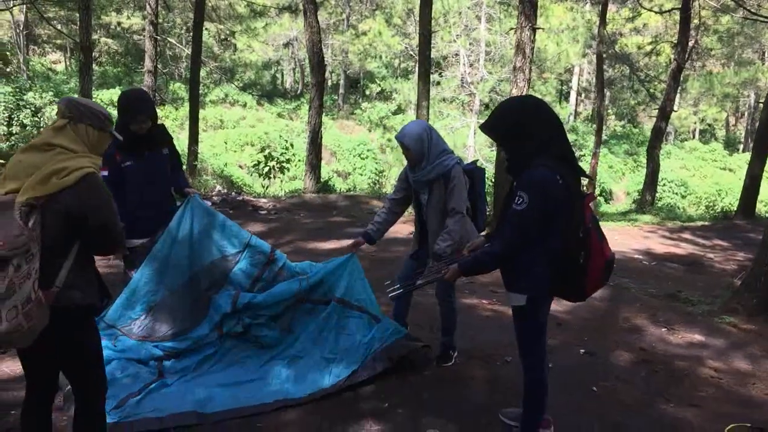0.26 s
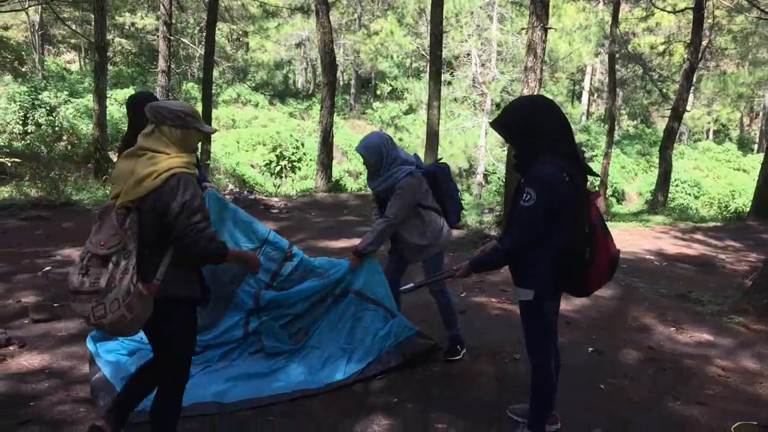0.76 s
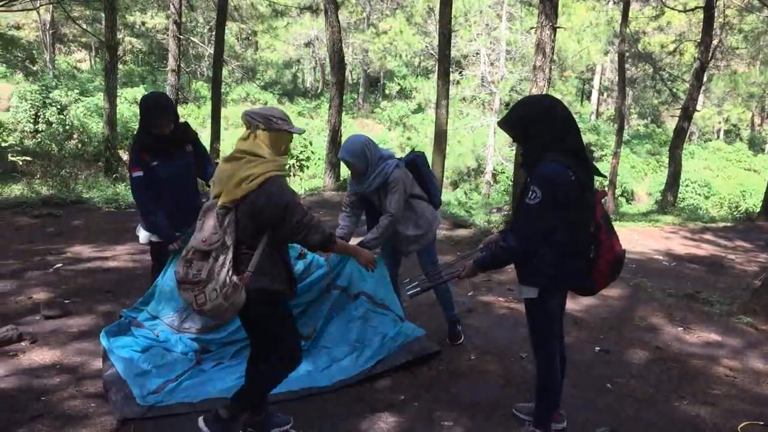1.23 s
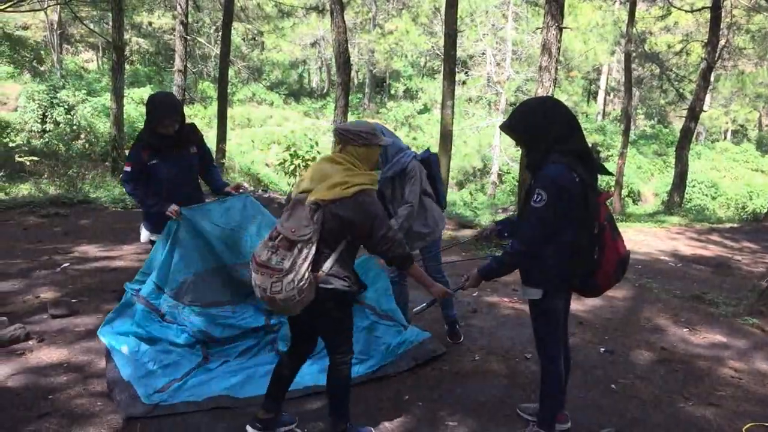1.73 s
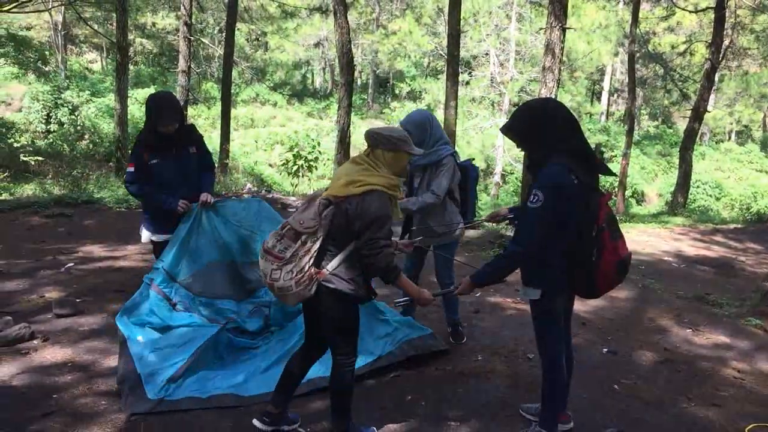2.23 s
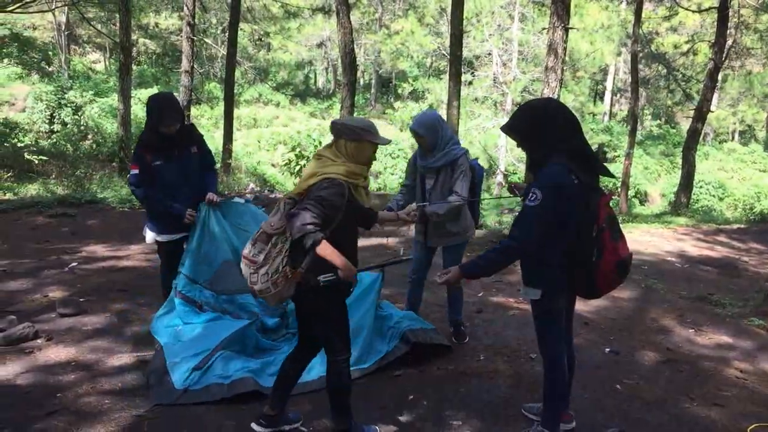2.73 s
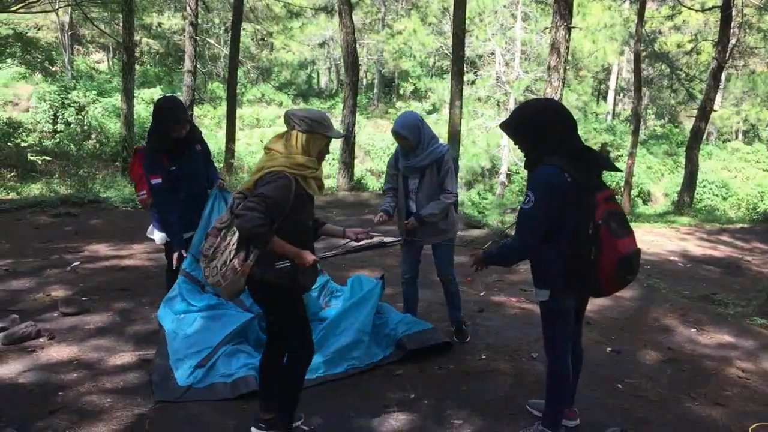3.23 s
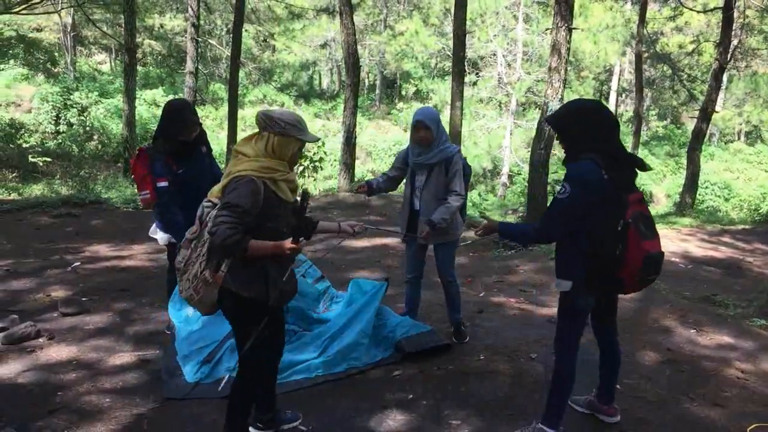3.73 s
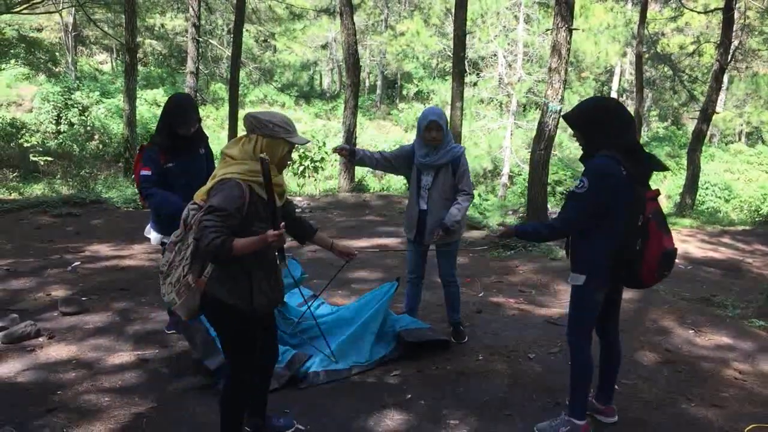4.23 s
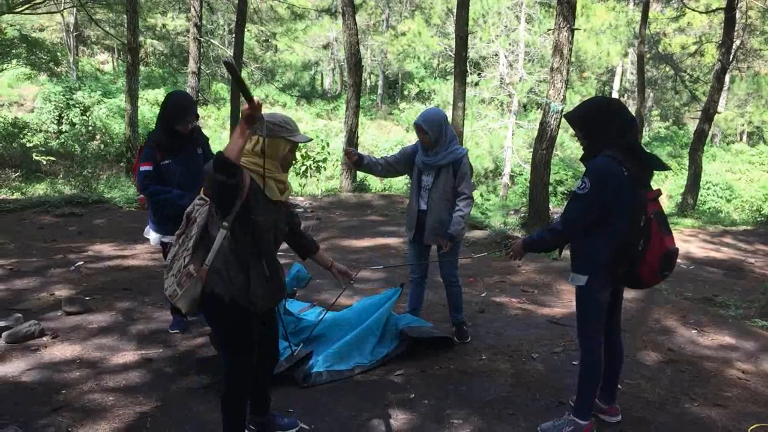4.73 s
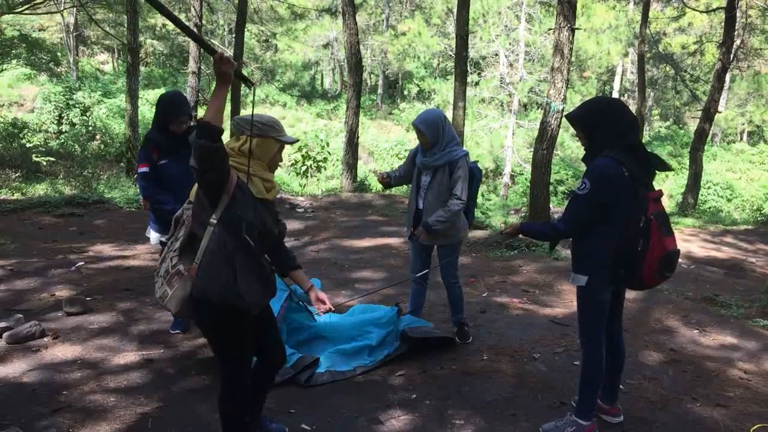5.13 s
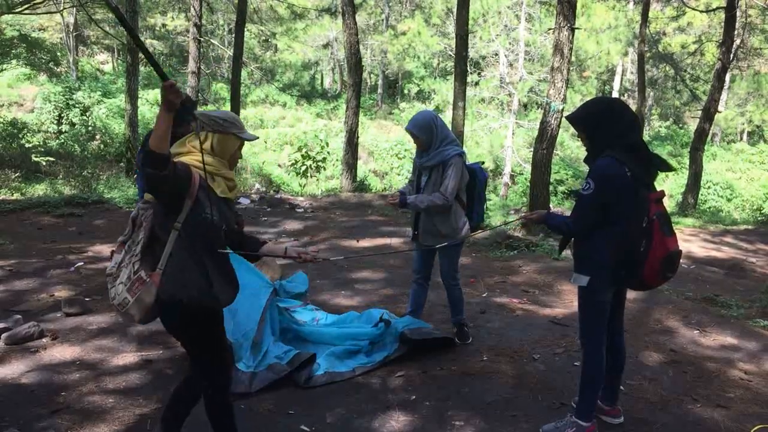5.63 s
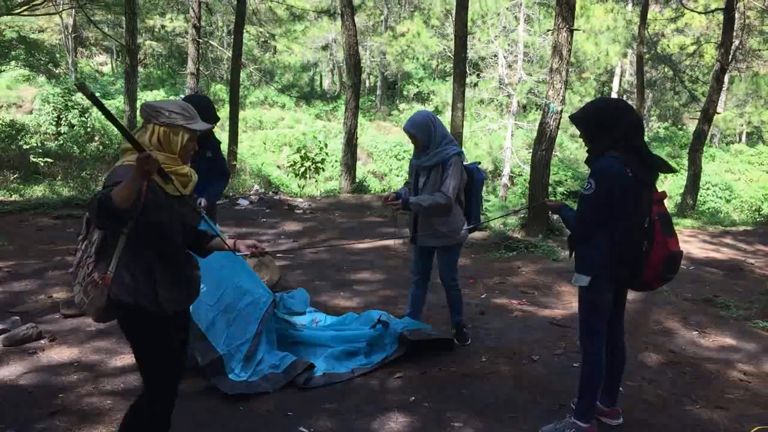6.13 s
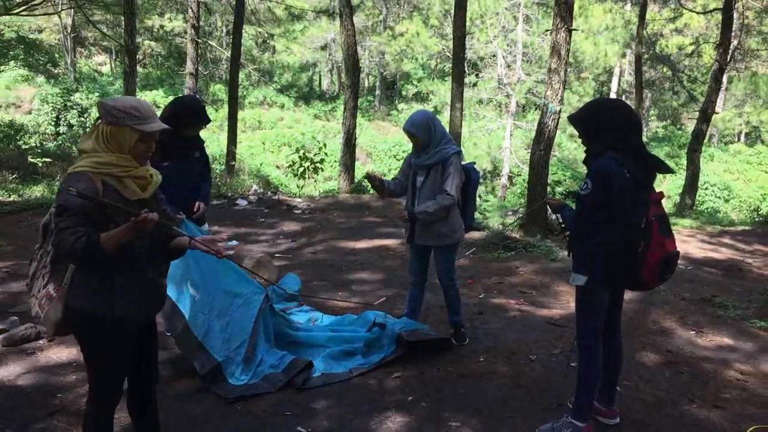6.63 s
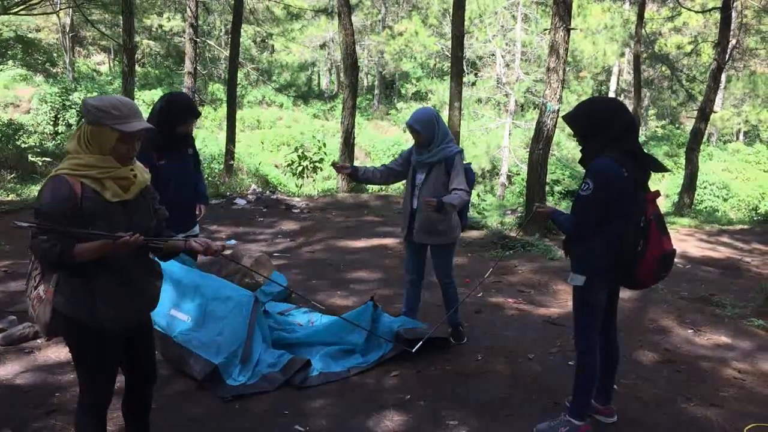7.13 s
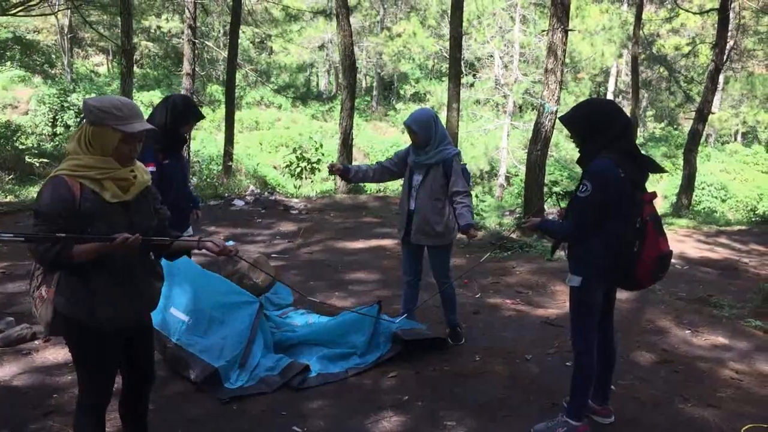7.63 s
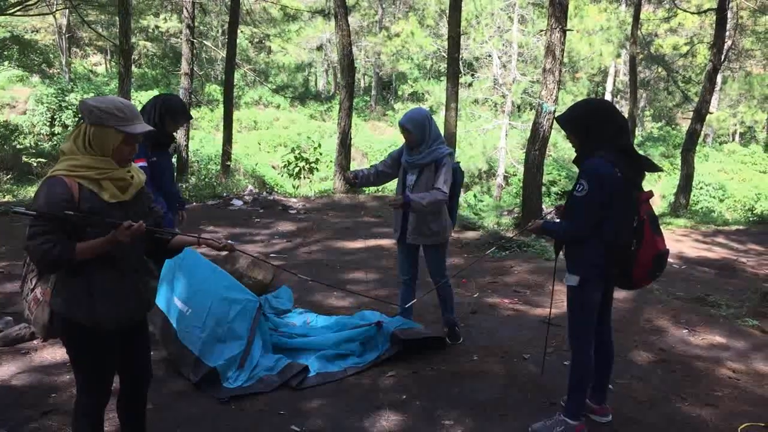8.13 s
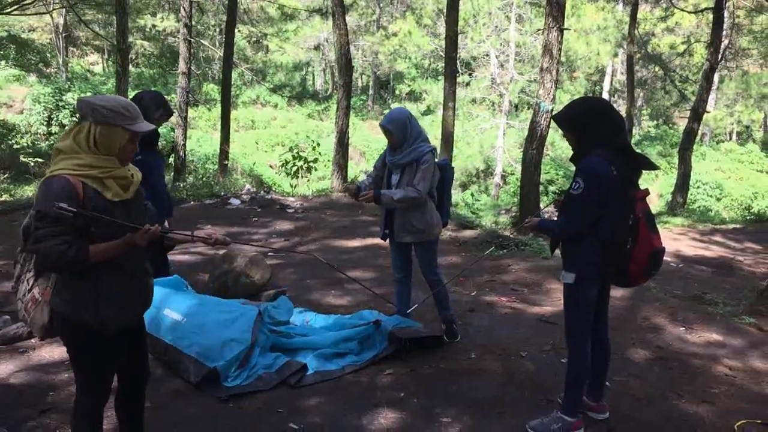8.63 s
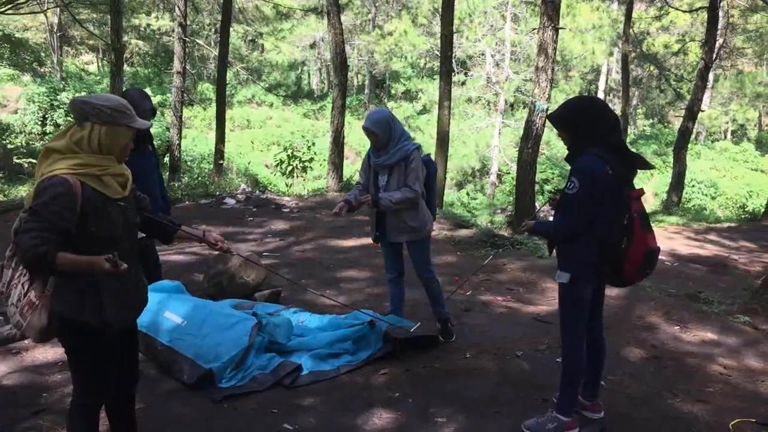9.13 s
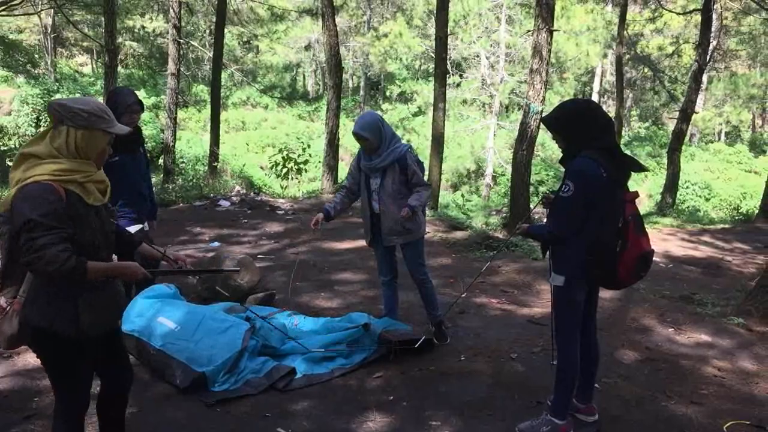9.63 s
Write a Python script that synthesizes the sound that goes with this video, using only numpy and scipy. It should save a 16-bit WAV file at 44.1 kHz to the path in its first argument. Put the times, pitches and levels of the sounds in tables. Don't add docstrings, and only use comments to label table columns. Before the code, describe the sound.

At a forest campsite, poles click and fabric rustles under low wind rumble and bird whistles, with a hard microphone bump around the middle.

```python
import sys
import numpy as np
from scipy import signal
from scipy.fft import rfft, irfft, next_fast_len
from scipy.io import wavfile
from scipy.ndimage import uniform_filter1d

SR = 44100
rng = np.random.default_rng(int(sys.argv[2]) if len(sys.argv) > 2 else 0)


def gain_from_decibels(decibels):
    exponent = np.asarray(decibels, float) / 20
    return 10 ** exponent


def bounce(signal):
    frames = np.transpose(np.atleast_2d(signal))
    limited = np.clip(frames, -1, 1)
    pcm = np.round(limited * 32767).astype(np.int16)
    wavfile.write(sys.argv[1], SR, pcm)


N = 435266
TIME = np.arange(N) / SR

# (time [s], buffeting level [dB])
WIND_STRENGTH = [(0, -30), (.3, -28.5), (1.3, -28), (2.3, -29), (2.6, -28.5), (3.0, -28.5), (3.7, -27.5),
                 (4.4, -28.5), (5.0, -29.5), (5.3, -27), (5.7, -29), (6.0, -28.5), (6.5, -28.5),
                 (6.75, -29.5), (7.5, -28.5), (8.2, -28.5), (8.65, -28.5), (8.96, -29)]
# (frequency [Hz], level per Hz [dB])
BUFFET_SPECTRUM = [(62, -43), (105, -5), (162, -6.5), (193, -1.5), (227, -6.5), (270, 3.5), (360, -2.5),
                   (409, 0), (507, -11), (580, -26), (620, -22), (810, -52), (1360, -120)]
# (frequency [Hz], width [Hz], level over the buffeting [dB])
HOLLOW_TONES = [(198, 30, 4), (262.6, 8.1, -0.5), (412, 95, 2), (694, 70, 7.5), (867, 110, 5)]
# (time [s], peak level [dB], rise per 10 dB [s], fall per 10 dB [s]), the signs of times ignored
EDDIES = [(.52, -34, 0.56, 0.9), (1.61, -30, 0.24, 0.3), (2.3, -34.5, .1, 0.46), (2.53, -33.5, .07, 0.1726),
          (3.19, -30.5, .2, .15), (3.48, -32.5, 0.056, 0.1), (3.82, -28.5, .11, 0.02),
          (4.06, -34, .15, 0.1151), (4.39, -32, .14, 0.1), (4.69, -33, .09, 0.4), (5.18, -24, .09, 0.06),
          (5.4, -34.5, .15, 0.35), (5.82, -32, .14, 0.14), (6.0, -38, .2, .5), (6.47, -32.5, .25, 0.15),
          (6.746, -31.5, .14, 0.15), (6.91, -33, .04, 0.2), (7.55, -38, .9, 0.8), (8.18, -30.5, .08, 0.3),
          (8.84, -28.5, 0.18, -0.9)]
# (time [s], peak level [dB], rise per 10 dB [s], fall per 10 dB [s])
LURCHES = [(.29, -52, .3, .1), (.63, -47, .08, 1), (2.47, -46, 0.68, 0.5), (3.4, -42, 0.0476, .05),
           (3.68, -37.5, .1, 0.0258), (3.83, -40, .03, .06), (4.24, -48, .3, 0.2843), (4.69, -44, .1, 0.5),
           (5.07, -38, .07, 0.0658), (5.4, -48.5, .12, .12), (5.726, -38.5, .05, 0.1915),
           (6.55, -46, .2, 1), (6.87, -48, .11, 0.567), (7.62, -44, .8, 0.0162), (7.9, -35, .03, -0.3),
           (8.18, -50, .08, .4), (8.65, -43, .25, -1), (8.88, -45, .08, -1.5), (8.96, -49, .04, -0.1129)]
# (frequency [Hz], level per Hz [dB])
LEAF_SPECTRUM = [(290, -37.5), (500, -0.5), (586, -17), (678, -8.5), (761, -17), (855, -12), (1130, -14),
                 (1250, -11.5), (1620, -19), (2330, -14), (3110, -17), (9490, -32), (16000, -40)]
# (frequency [Hz], width [Hz], level [dB])
PORT_COLOUR = [(3090, 580, -5.5), (4830, 350, -3), (6150, 710, -1), (7570, 1600, -4), (9400, 1300, 3),
               (10431, 300, -6.5)]
# (time [s], peak level [dB], rise per 10 dB [s], fall per 10 dB [s])
FOLDS = [(.04, -41.5, 0.093, 0.22), (.15, -45, .5, 1), (.3, -45, 0.068, 0.1), (1.11, -43, 0.086, 0.1),
         (1.55, -44.5, 0.15, -2), (1.61, -43.5, .04, -0.6), (1.67, -31.5, 0.05, 0),
         (1.762, -35, 0.043, -0.12), (2.03, -43, .15, -0.05), (2.13, -41.5, 0.0085, 0.1),
         (2.21, -42.5, 0.00819, 0.54), (2.96, -45.5, 0.17, 0.56), (4.11, -41, .4, 0.1945),
         (4.6, -49.5, 0.54, .5), (5.092, -33, 0.013, 0.1), (5.25, -48.5, .1, 1.9), (5.79, -47.5, .03, -1),
         (6.25, -45, 0.07, 0.1), (6.89, -45.5, 0.042, 0.1), (7.07, -50.5, .25, 0.3)]
# (time [s], peak level [dB], rise per 10 dB [s], fall per 10 dB [s])
SLIPS = [(.2, -51, .5, 0.4), (.46, -56.5, 0.20032, 0), (1.11, -55, .12, -0.1), (1.62, -48, .015, 0),
         (2.11, -49.5, .12, -0.1), (2.85, -55.5, .7, .2), (3.54, -53.5, .9, -0.2), (5.07, -54, .5, 0.5),
         (6.5, -61, .5, .5), (6.92, -49, .1, 0.2), (7.09, -55, .05, -0.5), (8.76, -59, 1.2, .5)]

# (time [s], length [s], frequency [Hz], level [dB])
FLAT_NOTES = [(1.385, 0.0707, 3300, -42.5), (2.735, 0.1, 3310, -49), (3.94, 0.115, 3300, -48.5),
              (5.27, 0.081, 3300, -47), (6.545, 0.069, 3280, -42.5), (7.99, 0.097, 3267, -44.5)]
# (time [s], length [s], frequency [Hz], level [dB])
PIP_NOTES = [(1.503, 0.018, 3660, -33.5), (2.872, 0.022, 3620, -30.5), (4.11, 0.028, 3720, -40),
             (5.39, 0.067, 3670, -50), (6.657, 0.042, 3600, -51), (8.13, 0.044, 3620, -45)]
# (time [s], length [s], first frequency [Hz], level [dB])
SLIDE_NOTES = [(1.539, 0.025, 4060, -33), (2.907, 0.025, 4070, -30), (4.146, 0.023, 4170, -33),
               (5.426, 0.03, 4000, -38), (6.6955, 0.03, 4090, -31), (8.168, 0.032, 3970, -38.5)]
# (time [s], length [s], reference frequency [Hz], level [dB])
DIP_NOTES = [(0.105, 0.097, 4420, -33.5), (1.764, 0.09, 4410, -35.5), (3.167, 0.092, 4340, -37),
             (4.405, 0.096, 4390, -41.5), (5.719, 0.092, 4360, -40), (7.095, 0.1, 4360, -38.5),
             (8.481, 0.096, 4335, -40)]
# (time [s], length [s], frequency [Hz], level [dB])
CHIP_NOTES = [(.02, 0.011, 3910, -38.5), (.073, 0.03, 3810, -40), (.253, 0.024, 3160, -43.5),
              (3.38, 0.016, 2705, -44), (5.87, 0.021, 3100, -51), (7.054, .016, 3870, -50),
              (8.826, .016, 3950, -49), (8.875, 0.014, 3900, -47), (8.925, 0.014, 3900, -46)]
# (time [s], length [s], frequency [Hz], level [dB])
FAR_NOTES = [
    (2.58, .15, 3300, -56),
    (6.3, .24, 3300, -56),
    (6.955, .085, 4050, -54),
    (3.08, .07, 4200, -53),
]
# (share of the note [1], pitch ratio [1], level [dB])
FLAT_SHAPE = [(0, 1, -7.5), (.4, 1, -7), (.8, 1, -4.5), (1, 1, -12)]
PIP_SHAPE = [(0, 1, -8), (.2, 1, -2), (.6, 1, -3), (1, 1, -10)]
SLIDE_SHAPE = [(0, 1, -1), (.1, .98, 1), (.85, .836, -5), (1, .802, -8), (1.15, .78, -20), (1.7, .7, -28)]
DIP_SHAPE = [(0, 1.04, -10), (.12, .88, -13), (.22, .81, -11), (.35, .765, -11), (.55, .742, -10),
             (.7, .764, -5), (.8, .815, 0), (1, .921, -8), (1.08, .93, -18)]
DIP_FALL_DB = [0, 2, -10, -7, -10, -15, -8]
SLIDE_BREAK_DB = [0, 0, -6, -8, -12, -10]
# (frequency [Hz], width [Hz], level [dB])
GROUND_DIP = [(3250, 450, -12)]

# (time [s], peak level [dB], frequency [Hz])
PUFFS = [(0.16, -19.5, 283), (0.234, -18.5, 373), (0.579, -18, 265), (0.869, -17.5, 344), (0.967, -18, 329),
         (1.484, -20, 266), (1.81, -20, 268), (2.004, -22, 407), (2.136, -21, 433), (2.508, -18.5, 418),
         (2.583, -14.5, 393), (3.101, -24, 408), (3.239, -24, 406), (3.823, -20, 270), (4.009, -17.5, 350),
         (4.344, -22.5, 370), (4.471, -18, 423), (5.215, -18, 278), (5.9, -24, 345), (5.957, -19, 412),
         (7.608, -20, 326), (8.001, -18, 340.6), (8.221, -20, 276)]
# (time [s], peak level [dB], low part [dB], high part [dB])
TICKS = [(0.2149, -36.5, -10, -21), (1.6467, -33, 9, -20), (2.0787, -37, -10, -13), (2.0885, -40, -6, -6),
         (2.1014, -40, 0, -3), (3.1697, -35, 1, -18), (3.2725, -36, 1, -12), (3.3255, -36, -16, -26),
         (3.333, -31, 1, -12), (3.5369, -39, 1, -25), (3.6505, -33, 1, -13.5), (3.686, -30.5, -16, -13),
         (3.9665, -25, -3, -30), (4.7535, -30, 0, -20), (4.96, -26, 3.5, -30.5), (5.4276, -35.5, -7, -30),
         (6.4492, -42, -4, -13), (7.214, -39, -12, -17), (7.6261, -35.5, -19.5, -13),
         (8.634, -33.5, -12, -20), (8.9585, -32, 9.5, -32)]
# (time [s], peak level [dB], low part [dB], high part [dB])
KNOCKS = [(0.2952, -24.5, -6, -6), (1.1757, -29.5, -9, -20), (1.544, -27, 10, -4), (1.604, -33, 15, -11),
          (1.6723, -23, -4, 8), (1.7015, -26, 5, -5.5), (1.7589, -23, 2, -6), (2.1335, -40, -9, -10.5),
          (2.2084, -28, -8, -12), (2.2416, -27, 0, -6), (2.889, -30.5, -13, -11), (2.953, -28.5, 20, -14),
          (3.0744, -31.5, 8, -1.5), (3.574, -31.5, -13, -7), (3.936, -31, -4.5, -10), (4.7545, -27, -17, 2),
          (8.9585, -30.5, 5, 14)]
# (time [s], peak level [dB], frequency [Hz])
TAPS = [(.875, -42, 681), (.981, -44, 686), (3.5, -37, 680), (3.815, -35.5, 708), (4.118, -31, 675),
        (5.537, -34, 700), (6.052, -37, 680), (6.226, -36, 680), (7.062, -36.5, 895), (8.27, -38, 678)]
# (time [s], peak level [dB], frequency [Hz], 60 dB decay [s])
SNAPS = [(1.607, -30, 921, 0.053), (1.635, -33, 2700, .02), (1.6425, -32, 1500, .015),
         (1.648, -39, 5750, 0.014), (1.657, -29, 2400, .012), (1.662, -27, 2300, .012),
         (1.6735, -29, 3900, 0.01), (1.68, -31, 1100, 0.028), (1.7025, -29, 2080, .02),
         (1.725, -29, 1500, .02), (1.742, -29, 1570, .02), (1.7595, -29, 1900, .015),
         (1.762, -30.5, 921, .045), (2.1355, -32, 1900, .015), (2.2145, -34, 4050, 0.0092),
         (2.264, -34, 2200, .012), (2.292, -34, 821, .04), (3.3252, -32, 6200, 0.01),
         (3.3277, -36, 5300, .008), (3.3346, -37, 4700, .015), (3.334, -43, 11700, .012),
         (3.966, -19.5, 6200, 0.0098), (3.9662, -23, 4300, .012), (3.9674, -22, 4900, .009),
         (3.9661, -38, 8700, 0.0091), (4.7532, -15, 2180, 0.0038), (4.7531, -24.5, 4000, 0.004),
         (4.7531, -30, 6000, .006), (4.7553, -20, 1790, 0.0078), (4.758, -24, 1900, .009),
         (4.7575, -33, 4420, .018), (4.758, -33.5, 5800, 0.013), (6.19, -48, 12000, .02),
         (3.339, -40, 6000, .015), (3.688, -44, 11500, .012), (7.222, -43, 6500, .015),
         (7.632, -46, 8500, .015), (8.838, -32, 1080, 0.038), (8.843, -33, 920, 0.038),
         (4.9619, -23, 4200, 0.0071)]
# (time [s], peak level [dB], low part [dB], high part [dB])
CRACKS = [
    (5.0698, -16, 0, -8),
    (8.805, -44, 16, -16),
]
# (time [s], peak level [dB], frequency [Hz], fade [s], shudder level [dB], shudder time [s])
BUMPS = [
    (5.0773, 1.0, 205, .0055, -22, .32),
    (6.8942, -6, 185, .006, -27, .2),
    (8.8515, -15, 150, .008, -34, .1),
]


def set_rms(x, db):
    return x * gain_from_decibels(db) / np.sqrt(np.mean(x ** 2))


def curve(table, column):
    return np.interp(TIME, np.array(table)[:, 0], np.array(table)[:, column])


def colour(x, points=((1, 0), (2, 0)), bells=()):
    size = next_fast_len(len(x))
    hz = np.arange(size // 2 + 1) * SR / size + 1e-3
    db = np.interp(np.log(hz), np.log(np.array(points)[:, 0]), np.array(points)[:, 1])
    for centre, width, peak_db in bells:
        db = db + peak_db * np.exp(-.5 * ((hz - centre) / (width / 2)) ** 2)
    return irfft(rfft(x, size) * gain_from_decibels(db), size)[:len(x)]


def even(x, span_s, share):
    swell = np.sqrt(np.abs(uniform_filter1d(x ** 2, int(span_s * SR))) + 1e-12)
    return set_rms(x / swell ** share, 0)


def walk(rate):
    hold = int(SR / rate)
    steps = np.repeat(rng.standard_normal(N // hold + 1), hold)[:N]
    return 1.3 * uniform_filter1d(uniform_filter1d(steps, hold), hold)


def swells(events, rest_db):
    t = TIME[::32]
    power = gain_from_decibels(2 * rest_db)
    for s, peak_db, rise_s, fall_s in events:
        away = np.where(t < s, (s - t) / abs(rise_s), (t - s) / abs(fall_s))
        power = power + gain_from_decibels(2 * (peak_db - 10 * away))
    return np.interp(TIME, t, np.sqrt(power))


def mottled(patchy_db, stripe_db):
    patches = signal.stft(rng.standard_normal(N), nperseg=512)[2]
    chance = uniform_filter1d(rng.standard_normal(patches.shape), size=2, axis=1) * np.sqrt(2)
    moments = rng.exponential(size=patches.shape[1])
    return signal.istft(patches * gain_from_decibels(patchy_db * chance + stripe_db * moments))[1][:N]


def add(out, s, sound):
    i = int(s * SR)
    out[i:i + len(sound)] += sound[:N - i]


def wind():
    tone_points = [(45, -63.5), (62, -10), (87, 2.0), (110, -15.5), (130, -67)]
    tone = even(colour(rng.standard_normal(N), tone_points, [(87, 16, 7.3)]), 0.14, 0.61)
    gusts = rng.standard_normal(N) * gain_from_decibels(1.1 * walk(60))
    buffet = even(colour(gusts, BUFFET_SPECTRUM, HOLLOW_TONES), 0.13, 1.0)
    lurch_points = [(15, -46.5), (30, -16.5), (55, 4.5), (66, -0.5), (80, -56.5)]
    lurch = even(colour(rng.standard_normal(N), lurch_points), 0.2, .7)
    calm_tone_db, calm_lurch_db = -46, -60
    out = tone * swells(EDDIES, calm_tone_db)
    out = out + buffet * gain_from_decibels(curve(WIND_STRENGTH, 1))
    return out + lurch * swells(LURCHES, calm_lurch_db) * gain_from_decibels(1.1)


def leaves():
    hiss = mottled(2.6, .3) * gain_from_decibels(0.43 * walk(1.5))
    return set_rms(colour(hiss, LEAF_SPECTRUM, HOLLOW_TONES[3:]), -45)


def cloth():
    fold_points = [(550, -39.5), (780, 1), (1000, -2.0), (2000, -2.5), (2800, -5), (4200, -16.5),
                   (6500, -30), (9000, -70)]
    fizz_points = [(3000, -39), (4400, 0.5), (6500, 0), (9500, -13.5), (13000, -16.5), (16000, -28)]
    folds = even(colour(mottled(4.5, 1.2), fold_points), 0.034, 0.2)
    fizz = even(colour(mottled(2.5, 1.2), fizz_points), .05, .6)
    slack_folds_db, slack_slips_db = -51.5, -65
    rustle = folds * swells(FOLDS, slack_folds_db) * gain_from_decibels(-0.7)
    return rustle + fizz * swells(SLIPS, slack_slips_db) * gain_from_decibels(-7.0)


def bird():
    out, waver = np.zeros(N), walk(130)
    unsteady_share = .012
    kinds = (("flat", FLAT_NOTES + FAR_NOTES, FLAT_SHAPE), ("pip", PIP_NOTES, PIP_SHAPE),
             ("slide", SLIDE_NOTES, SLIDE_SHAPE), ("dip", DIP_NOTES, DIP_SHAPE),
             ("chip", CHIP_NOTES, PIP_SHAPE))
    for kind, notes, shape in kinds:
        share, ratio, swell_db = np.transpose(shape)
        for k, (s, length, hz, db) in enumerate(notes):
            u = np.arange(int(share[-1] * length * SR)) / (length * SR)
            turned_db = 0
            if kind == "dip":
                bottom = np.exp(-((u - .5) / .18) ** 4) + np.exp(-((u - .89) / .035) ** 2)
                turned_db = DIP_FALL_DB[k] * bottom
            if kind == "slide":
                turned_db = SLIDE_BREAK_DB[k] * np.exp(-((u - .42) / .17) ** 2)
            pitch = hz * np.interp(u, share, ratio)
            if kind in ("dip", "chip"):
                pitch = pitch * (1 + unsteady_share * waver[::-1][int(s * SR):][:len(u)])
            tone = np.sqrt(2) * np.sin(2 * np.pi * np.cumsum(pitch) / SR)
            edge = signal.windows.tukey(len(u), .2)
            add(out, s, tone * edge * gain_from_decibels(db + turned_db + np.interp(u, share, swell_db)))
    return out * gain_from_decibels(2.4 * waver)


def trunks(x, t60_s, wet_db, gap_s, bells=()):
    t = TIME[:SR]
    returns = rng.standard_normal(SR) * gain_from_decibels(3.2 * rng.exponential(size=SR))
    tail = returns * 1000. ** (-t / t60_s) * (t > gap_s)
    tail = colour(tail * gain_from_decibels(wet_db) / np.sqrt(np.sum(tail ** 2)), bells=bells)
    return x + signal.fftconvolve(x, tail)[:N]


def birdsong():
    sung = bird()
    sung = sung + gain_from_decibels(-11) * np.roll(sung, int(.021 * SR))
    near = trunks(sung, .07, -10, .008, GROUND_DIP)
    return trunks(near, .6, -9.5, 0.02, GROUND_DIP)


def damped_modes(table, rise_s, t60_s=None, lift_db=0):
    out, t = np.zeros(N), TIME[:4096]
    for s, peak_db, hz, *own in table:
        decay_s = own[0] if own else t60_s
        shape = (1 - np.exp(-t / abs(rise_s))) * 1000. ** (-t / abs(decay_s))
        add(out, s, np.sin(2 * np.pi * hz * t) * shape / shape.max() * gain_from_decibels(peak_db + lift_db))
    return out


def puffs():
    return damped_modes(PUFFS, 0.0062, 0.087, -5)


def poles(table, hz, modes, chatter_s, ring_s):
    out, t = np.zeros(N), TIME[:4096] - TIME[512]
    low_hz, mid_hz, high_hz = hz
    hisses = rng.standard_normal((len(table), len(t)))
    contact = (t > 0) * 1000. ** (-np.maximum(t - chatter_s, 0) / abs(ring_s))
    for (s, peak_db, low_db, high_db), hiss in zip(table, hisses):
        tilt = [(.3 * low_hz, low_db - 90.0), (0.65 * low_hz, low_db - 22), (low_hz, low_db + 9.0),
                (mid_hz, 0), (high_hz, high_db + 4.5), (1.15 * high_hz, high_db - 2.0),
                (1.35 * high_hz, high_db - 27), (3 * high_hz, high_db - 89.5)]
        sound = colour(hiss * contact, tilt, modes)
        add(out, s + t[0], sound * gain_from_decibels(peak_db) / np.abs(sound).max())
    return out


def ticks():
    return poles(TICKS, (3900, 5800, 10500), [(4470, 270, 4.2), (6340, 840, 5)], 0.0015, .012)


def dull_blows(table, ring_s):
    return poles(table, (950, 1700, 2500), [(1590, 150, 4), (1950, 200, 5)], .0025, ring_s)


def pole_hits():
    knocks = dull_blows(KNOCKS, 0.024) + dull_blows(CRACKS, .026)
    taps = damped_modes(TAPS, 0.0031, .07)
    snaps = damped_modes(SNAPS, .00025)
    return trunks(ticks() + knocks + .5 * snaps + taps, 0.11, -7.5, 0.0044) + .5 * snaps


def bumps():
    out, t = np.zeros(N), TIME[:SR // 2] - .01
    body_points = [(90, -30), (150, -3), (200, 0), (260, -6), (380, -30), (700, -120)]
    for s, peak_db, hz, fade_s, shudder_db, shudder_s in BUMPS:
        turns = hz * (.25 * t + .75 * .005 * (1 - np.exp(-t / .005)))
        push = np.where(t < 0, np.exp(-(t / .0028) ** 4), np.exp(-t / fade_s))
        swing = np.cos(2 * np.pi * turns) * push * gain_from_decibels(peak_db)
        body = even(colour(rng.standard_normal(len(t)), body_points), 0.021, 0.6)
        fade = np.clip(t / 0.0096, 0, 1) * 1000. ** (-(t / shudder_s) ** 2)
        add(out, s + t[0], body * gain_from_decibels(shudder_db + 0.5) * fade - swing)
    return colour(out, [(420, 0), (900, -40)])


def scene():
    rustling = colour(leaves() + cloth(), bells=PORT_COLOUR)
    return (wind() + rustling + birdsong() + puffs() + pole_hits() + bumps())[None]


def roll_off(x):
    return signal.sosfilt(signal.butter(12, 16610, fs=SR, output="sos"), x)


def record(dry):
    top_hz, stop_s = 15730, 8.9664
    clipped = np.clip(dry[0], -.985, .985)
    dull = colour(clipped, [(top_hz, 0), (top_hz + 30, -90)])[None]
    return roll_off(dull * (TIME < stop_s))


dry = scene()
out = record(dry)
bounce(out)
```